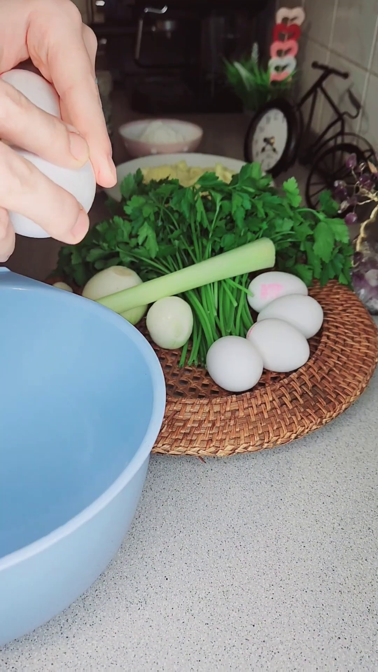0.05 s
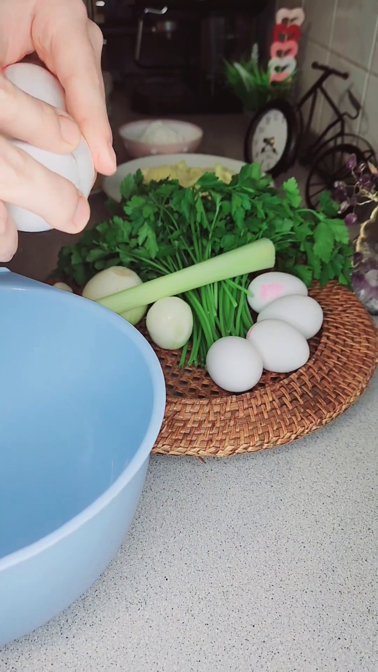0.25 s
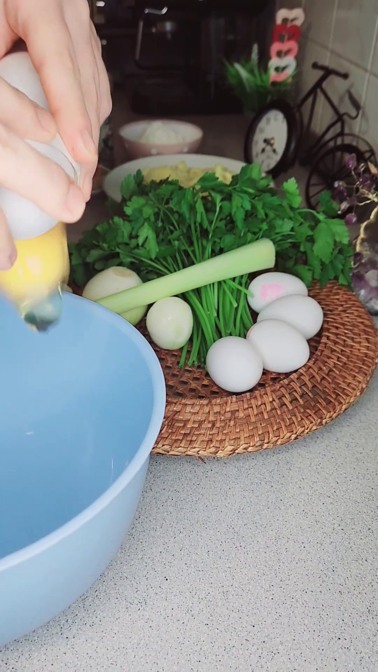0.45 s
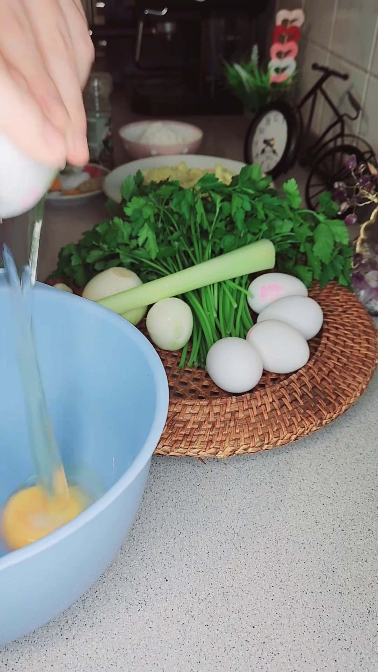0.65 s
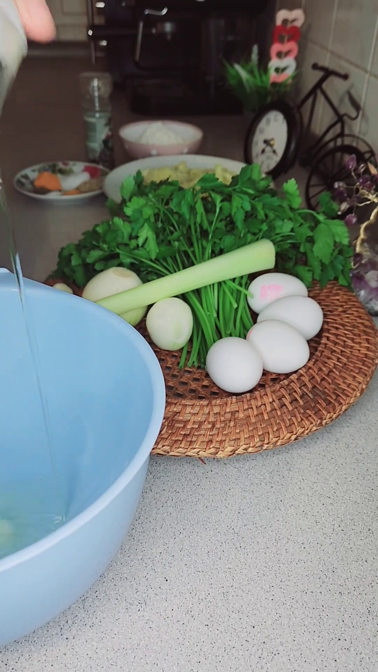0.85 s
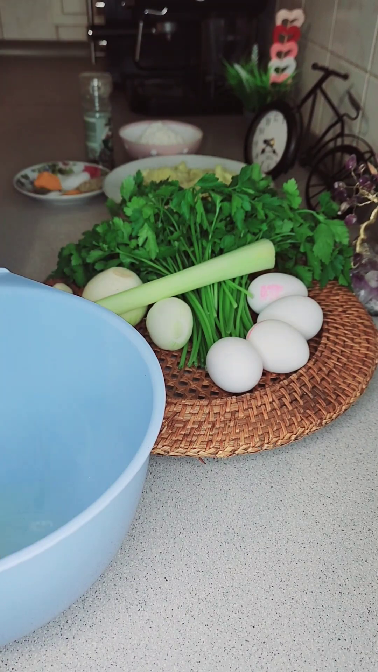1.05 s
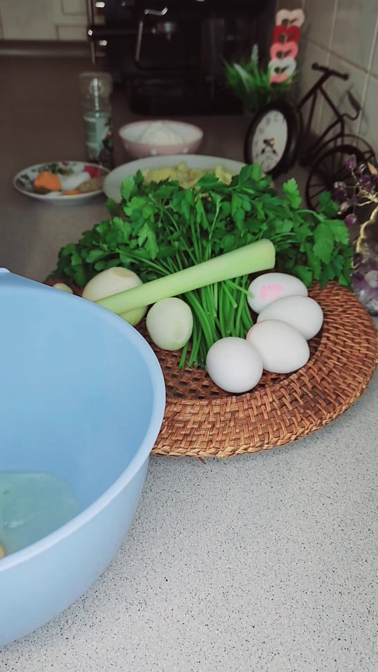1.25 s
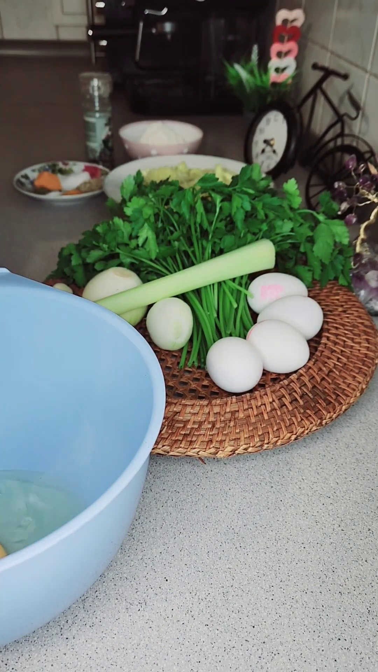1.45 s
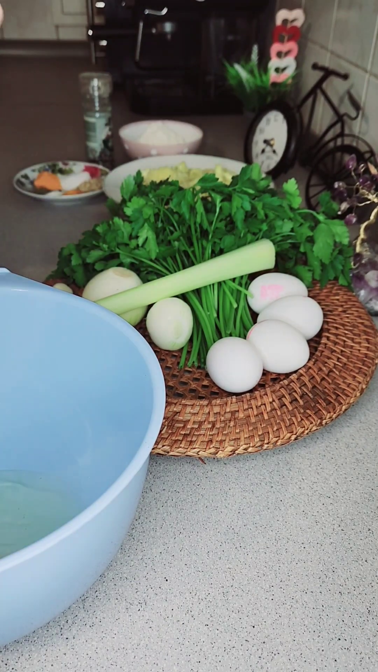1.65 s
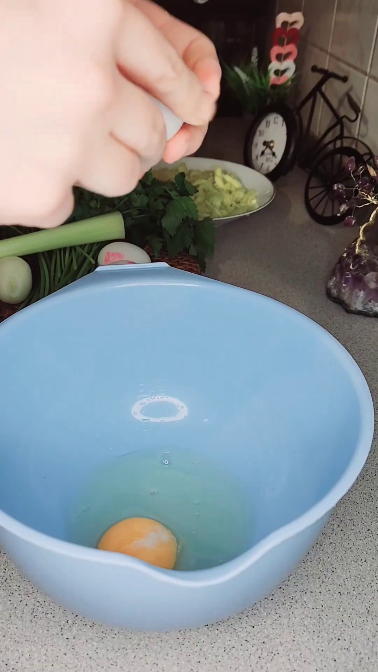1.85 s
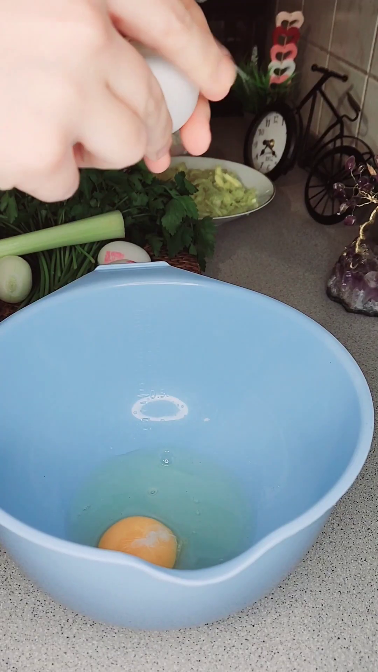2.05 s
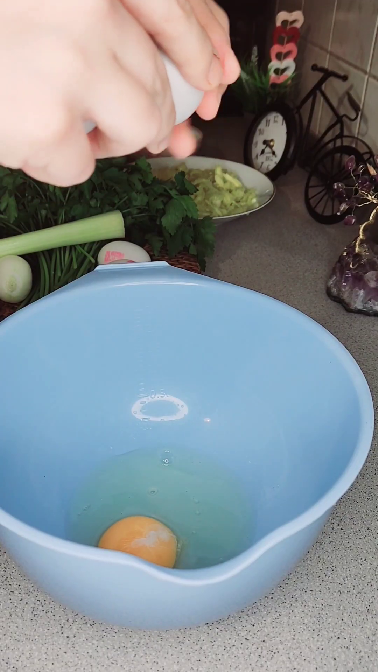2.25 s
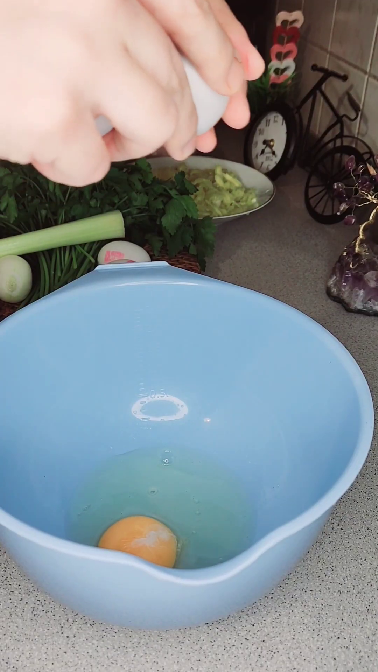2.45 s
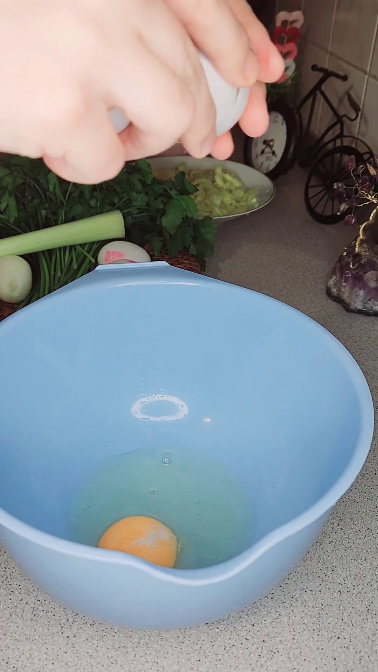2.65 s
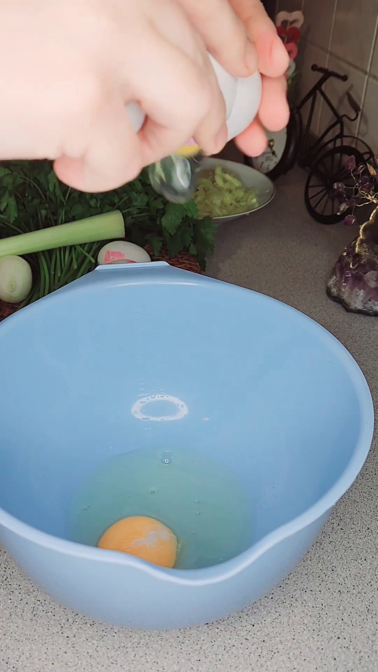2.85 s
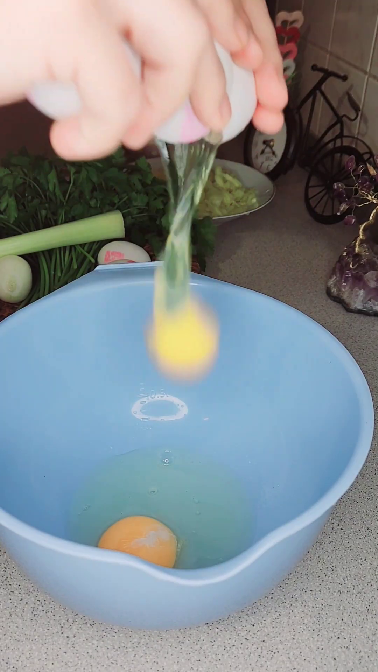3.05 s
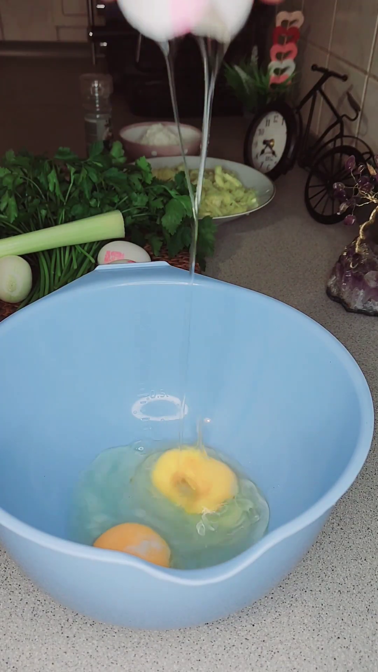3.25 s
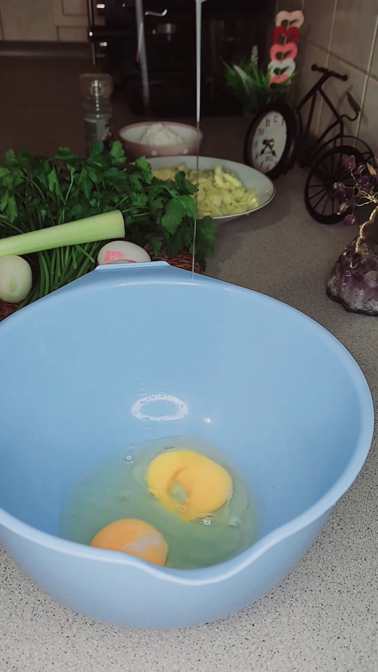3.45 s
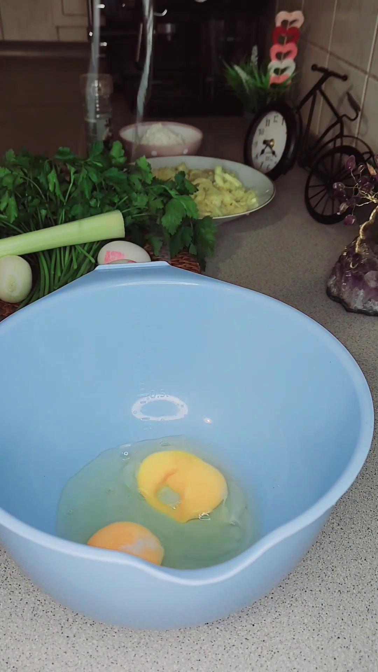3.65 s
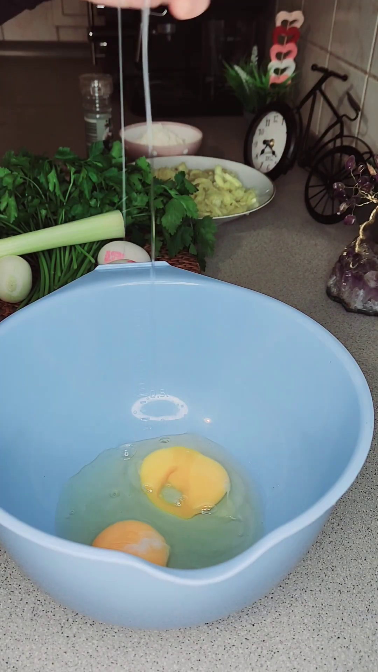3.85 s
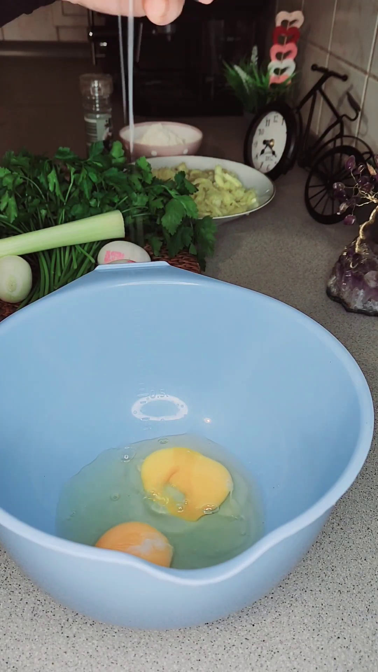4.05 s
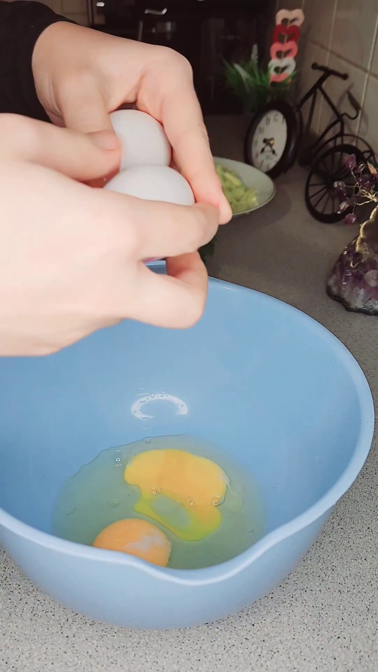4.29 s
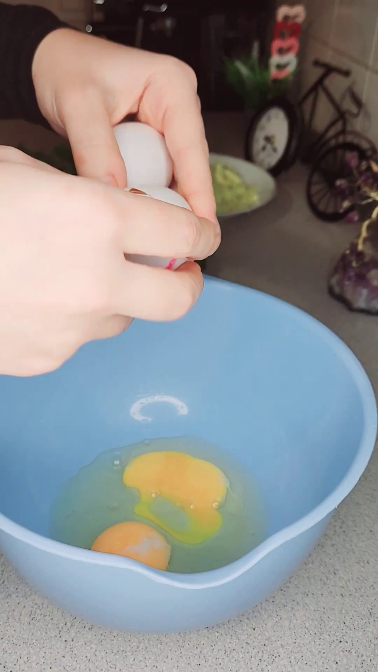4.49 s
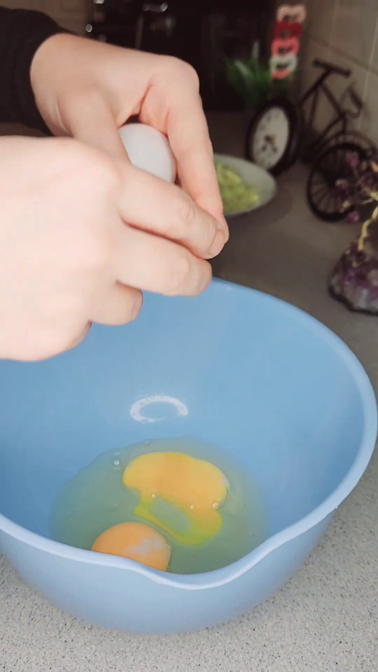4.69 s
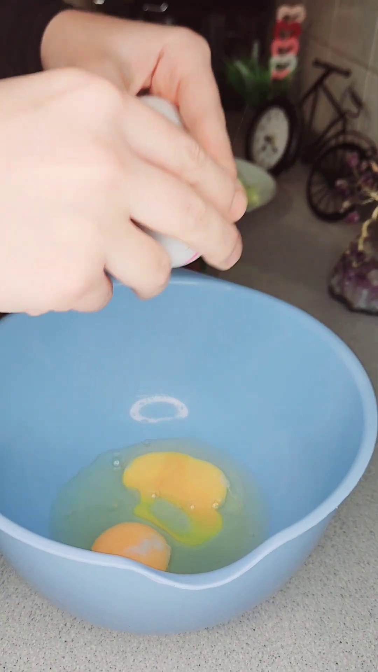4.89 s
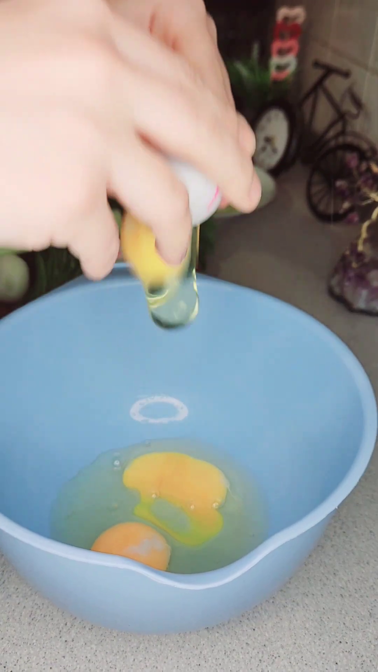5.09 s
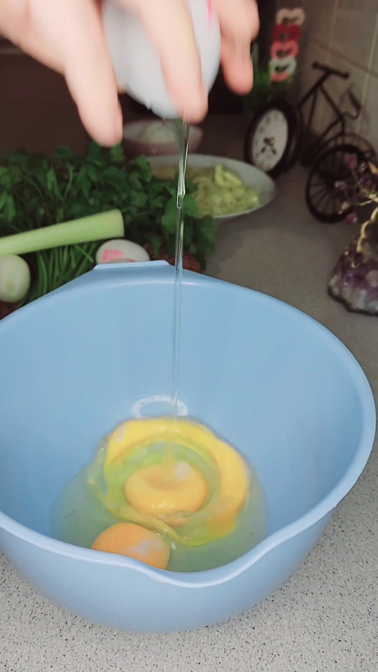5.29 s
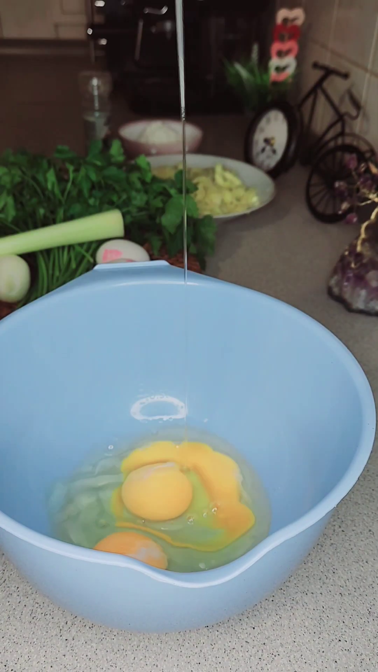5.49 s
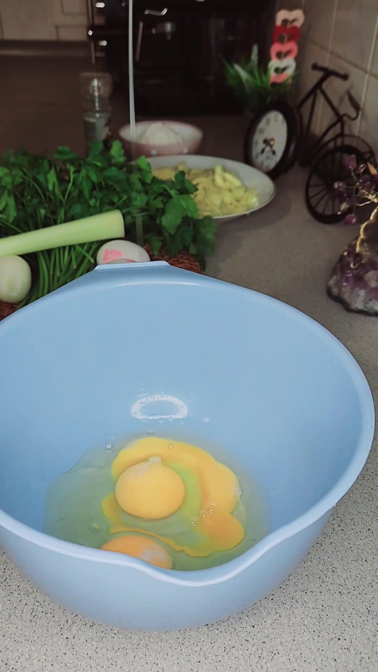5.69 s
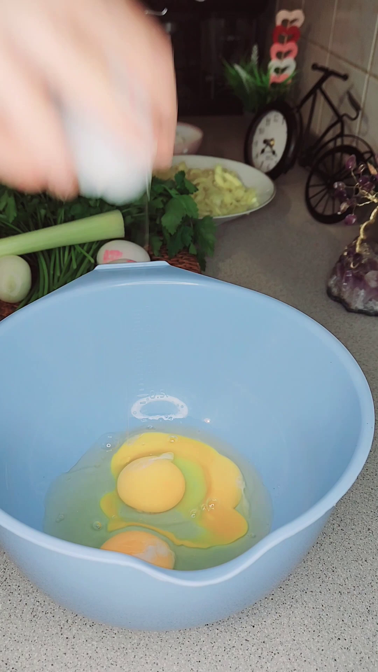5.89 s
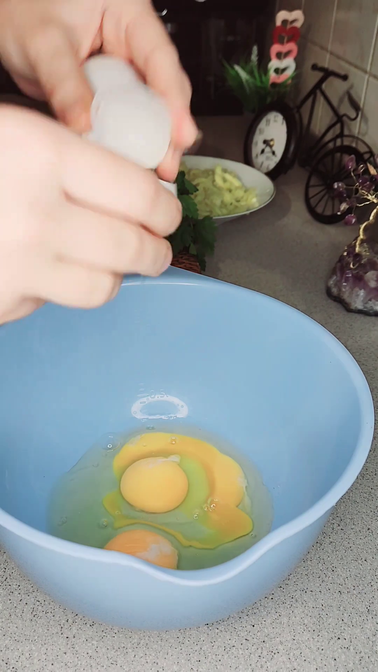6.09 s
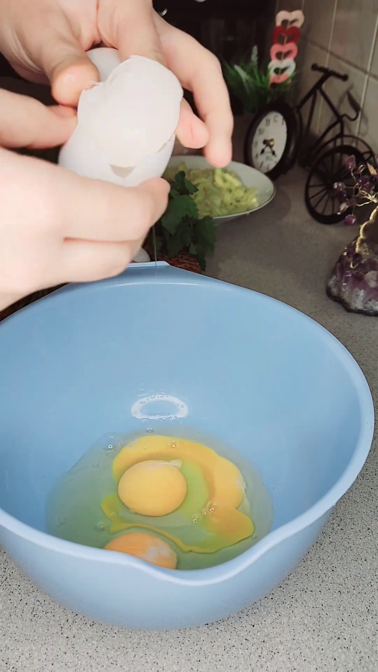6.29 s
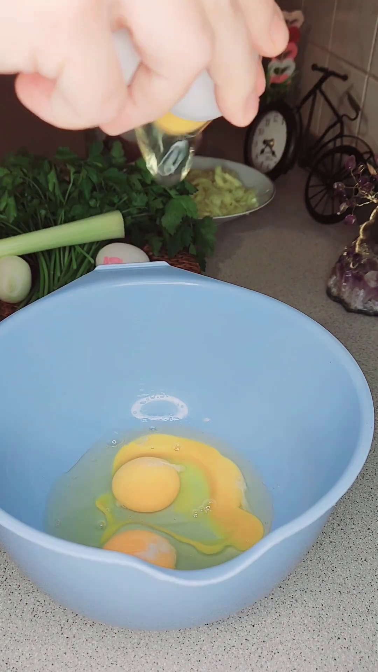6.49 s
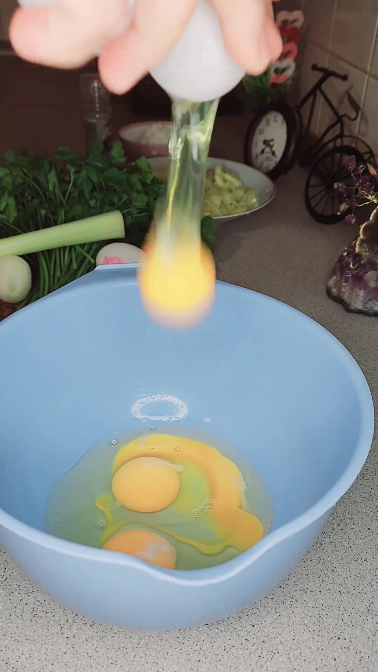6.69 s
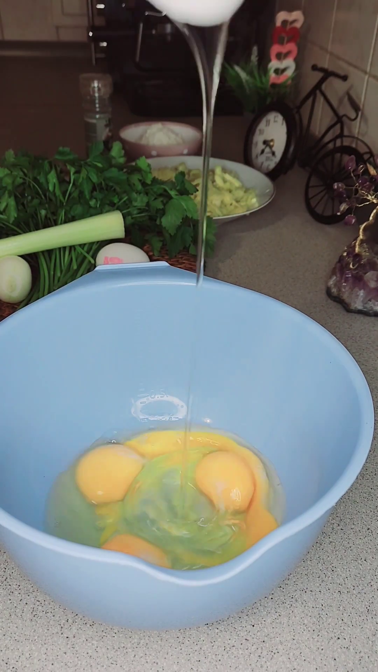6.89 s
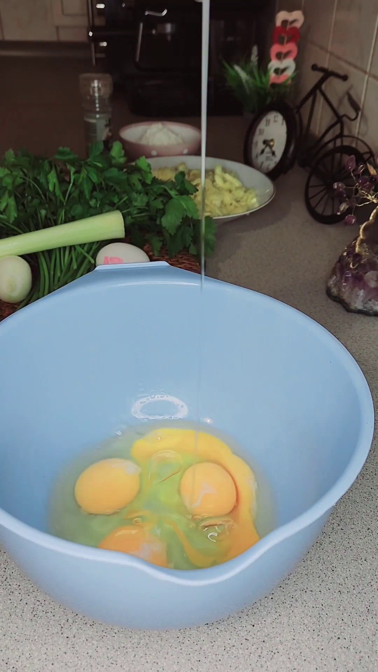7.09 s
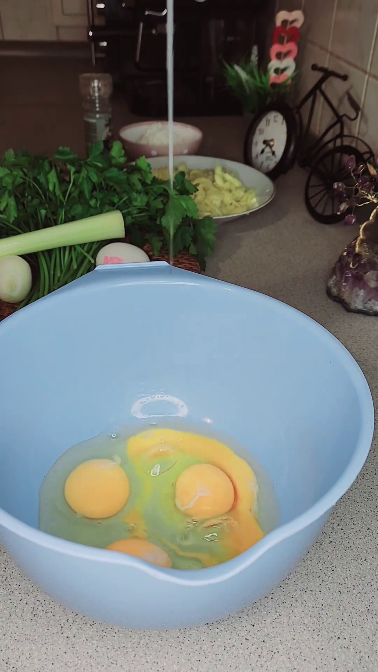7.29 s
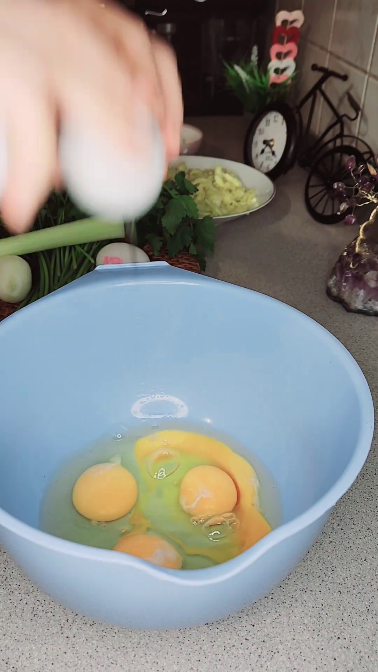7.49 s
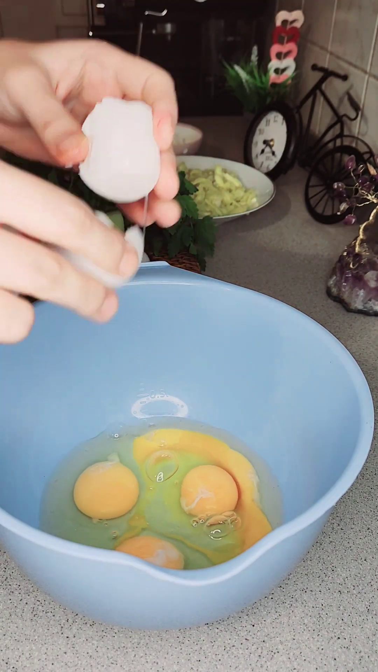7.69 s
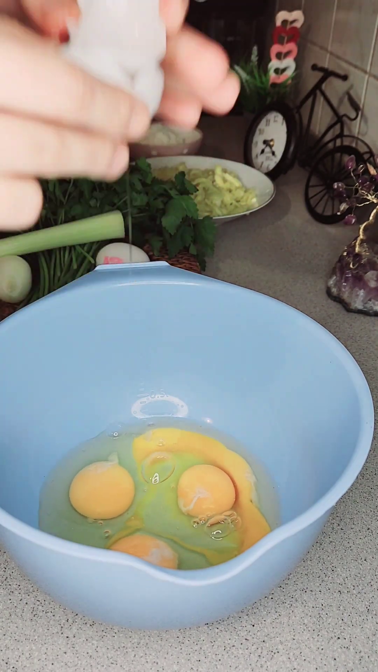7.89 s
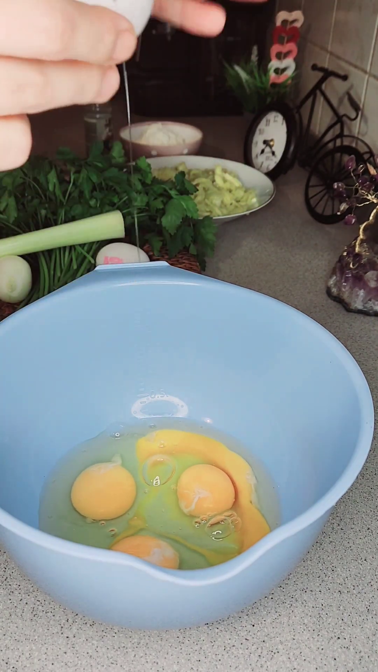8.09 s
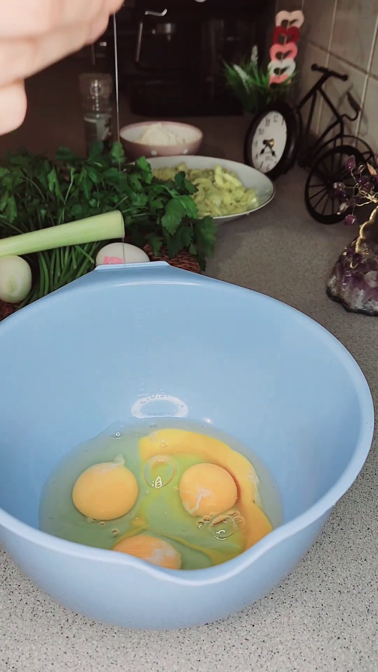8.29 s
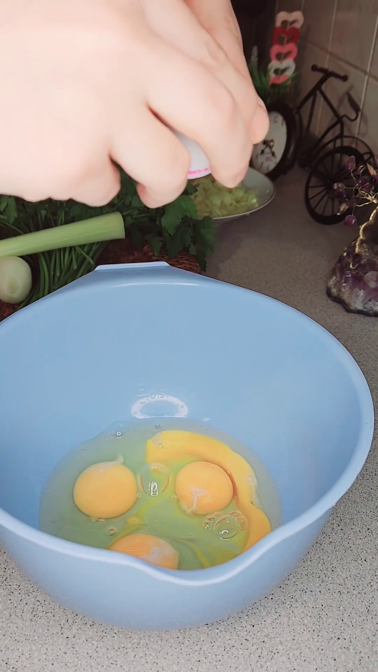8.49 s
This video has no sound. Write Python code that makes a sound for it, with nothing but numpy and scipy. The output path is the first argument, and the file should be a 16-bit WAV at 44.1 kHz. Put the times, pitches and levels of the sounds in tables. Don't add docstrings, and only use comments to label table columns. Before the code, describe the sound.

Close, crisp eggshell cracks and crackling tears, then soft wet plops and low bowl thumps, repeated egg by egg over a faint fridge hum.

```python
import sys
import numpy as np
from scipy import signal
from scipy.fft import rfft, irfft, next_fast_len
from scipy.io import wavfile
from scipy.ndimage import uniform_filter1d, map_coordinates

SR = 44100
rng = np.random.default_rng(int(sys.argv[2]) if len(sys.argv) > 2 else 0)


def gain_from_db(level_db):
    decades = np.asarray(level_db, float) / 20
    return 10 ** decades


def materialize(psi):
    bounded = np.clip(np.atleast_2d(psi).T, -1, 1)
    quanta = np.round(bounded * 32767).astype(np.int16)
    wavfile.write(sys.argv[1], SR, quanta)


N = 376569


def unit(x):
    return x / np.sqrt(np.mean(x ** 2) + 1e-20)


def along(points, hz):
    f, v = np.transpose(points)
    return np.interp(np.log(hz + 1), np.log(f + 1), v)


def gain_at(points, t):
    s, db = np.transpose(points)
    return gain_from_db(np.interp(t, s, db))


def filtered(x, response):
    m = next_fast_len(N + SR // 2)
    return irfft(rfft(x, m) * response(np.fft.rfftfreq(m, 1 / SR)), m)[..., :N]


def in_step(hz):
    cycles = np.round(12 * hz / SR)
    return np.round(cycles * SR / hz).astype(int)


def pick(modes, count, spread):
    hz, db = np.array(modes)[rng.integers(0, len(modes), count)].T
    return hz * np.exp(spread * rng.standard_normal(count)), db


def grains(s, db, hz, cycles, lag, size=160):
    k = np.arange(size)
    turns = np.clip(hz, 200, .45 * SR)[:, None] * k / SR
    left = gain_from_db(db)[:, None] * np.sin(2 * np.pi * turns) * np.exp(-turns / cycles)
    right = left * gain_from_db(rng.normal(0, 4, (len(s), 1)))
    at_left = np.round(s * SR).astype(int)[:, None] + k
    at_right = at_left + lag[:, None]
    return np.array([np.bincount(at.ravel(), ring.ravel(), N + SR)[:N]
                     for at, ring in ((at_left, left), (at_right, right))])


def swarm(rows, count):
    s, db, *cols, t60 = np.repeat(np.array(rows), count, axis=0).T
    turn = (np.arange(len(s)) % count + rng.uniform(0, 1, len(s))) / count
    late = turn ** 1.3 * t60 / 2
    size_db = db - 4.0 + 12 * np.log10(t60 / 0.088 + 0.43) - 60 * late / t60
    size_db += 20 * np.log10(1 - 0.55 * np.exp(-late / (0.024 * t60)))
    blow_db, blow_s = 2.5, 0.0038
    size_db += blow_db * late / blow_s * np.exp(1 - late / blow_s)
    lag = np.repeat(rng.integers(5, 19, len(rows)), count)
    return s + late, size_db, late, lag, cols


def fracture(s, db, hz, edge_db, top_db, lag, spiky_db):
    # pitch_hz, level_db
    piece_rings = [(3150, -7), (3680, 0), (4400, -4), (5400, -7)]
    # pitch_hz, level_db
    edge_rings = [(6500, -9), (7300, 0), (7900, -1)]
    count = len(s)
    scatter = rng.standard_normal((count, 3))
    crack_size = np.minimum(rng.exponential(1, count), 3.5)
    db = db + spiky_db * (crack_size - 1)
    small_db = -5 + 0.15 * edge_db
    small_hz, small_share_db = pick(piece_rings, count, spread=.06)
    edge_hz, edge_share_db = pick(edge_rings, count, spread=.03)
    large_hz = hz * np.exp(.11 * scatter[:, 0])
    top_hz = 13200 * np.exp(0.56 * scatter[:, 1])
    dry_hz = 1.15 * hz * np.exp(0.27 * scatter[:, 2])
    large = grains(s, db, large_hz, cycles=3.8, lag=lag, size=320)
    small = grains(s, db + small_db + small_share_db + 3, small_hz, cycles=7, lag=lag, size=280)
    edge = grains(s, db + edge_db + edge_share_db + 4, edge_hz, cycles=5.5, lag=lag, size=140)
    top = grains(s, db + top_db, top_hz, cycles=0.4, lag=lag, size=40)
    crack = grains(s, db - 3, dry_hz, cycles=2.2, lag=lag)
    return crack + large + small + edge + top


def snaps():
    # start_s, peak_db, sharpness_db, t60_s
    halves = [(.8741, -48, 0, 0.17), (.9193, -48.5, 3, 0.089), (4.479, -45.5, -3.5, 0.06),
              (1.775, -49, -13, 0.19), (1.8375, -51, 13.5, 0.03), (2.2477, -54, 11, 0.039),
              (3.225, -49.5, -19, .19), (4.5041, -51, -1, 0.18), (5.074, -43.5, -5.5, 0.058),
              (5.2372, -50, 21, 0.02), (6.595, -46, -0.5, 0.043), (6.801, -46, -8, 0.14),
              (6.879, -40.5, -5, 0.046), (7.7932, -74, 14, 0.021)]
    plates = [(.3586, -33.5, 3.5, 0.07), (.6378, -26.5, -11, 0.05), (.701, -56.5, -13, .12),
              (.709, -33, -52, 0.026), (.73, -41, -12, 0.11), (.742, -41.5, -19.5, 0.056),
              (2.8777, -57.5, 10.5, 0.03), (3.0696, -44, 4, 0.087), (3.134, -44, -22.5, 0.035),
              (3.1794, -58.5, 4, 0.028), (3.2075, -32, -2, 0.013), (4.06, -60, 0, 0.04),
              (4.434, -50.5, -12, 0.033), (4.4665, -52, 1, 0.0066), (5.1155, -38, -5.5, .08),
              (5.202, -44, -58, 0.16), (5.2146, -37, -18, 0.09), (6.2243, -46, 2, 0.073),
              (6.294, -50.5, -4, 0.036), (6.3713, -52.5, -33, 0.06), (6.417, -43, 9.5, 0.039),
              (6.7446, -49.5, 1, 0.1)]
    flakes = [(.2468, -31, 3, .085), (.782, -36.5, 0, .082), (.9469, -49.5, -5.5, .14),
              (1.766, -48, -12, .22), (2.4327, -53, 9.5, 0.059), (2.7584, -48, 4, .11),
              (2.8197, -47, 3, 0.029), (3.268, -35, -2, .025), (4.119, -43.5, 7, .1),
              (4.858, -54.5, 16, 0.073), (4.9304, -29, -12, .08), (4.941, -26.5, -10.5, .06),
              (5.291, -49, 0, .14), (5.5754, -51, -1, .13), (6.2046, -56, 2.5, .12), (6.479, -48, 5.5, .12),
              (6.489, -41.5, -1, .13), (6.754, -48, -31, 0.086), (6.7866, -47, -9, 0.15),
              (6.985, -66, -6, .11), (7.1062, -42, -8, .025), (7.161, -57, 5, 0.037),
              (7.1694, -44.5, -8, .089), (7.181, -42, -1, .056), (7.236, -45.5, -2.5, .1),
              (7.652, -49.5, -9.5, .069), (7.8595, -39, -8, 0.14), (8.0098, -45, 3, .11),
              (8.114, -41.5, 7.5, .093), (8.2256, -43.5, -1.5, .062)]
    chips = [(.193, -59, 5.5, 0.32), (.2275, -40.5, -1.5, .09), (.615, -51, -8, 0.074),
             (2.601, -48, -16, 0.027), (4.097, -40, 3, .06), (4.53, -61, 19.5, .045),
             (4.8714, -34.5, 10, 0.023), (4.88, -35.5, 0, .19), (5.312, -41, -1.5, .05),
             (5.329, -45.5, 6, 0.062), (5.6982, -52, 1, 0.054), (5.7169, -46, -2, .085),
             (6.853, -42.5, -8, 0.02), (6.8495, -63, 17.5, .015), (6.8715, -58.5, 18, .015),
             (6.976, -57, 2.5, .1), (4.517, -51, 8, .04), (2.811, -52.5, -5, 0.049),
             (8.02, -49.5, -0.5, .05), (4.849, -58, 9.5, .12), (7.2815, -39, -2.5, 0.025),
             (8.0269, -44.5, 5.5, .12), (8.0525, -37, -3.5, 0.24), (8.086, -45, 17, 0.044),
             (8.103, -50.5, 12.5, 0.14), (8.18, -47.5, -11, 0.081)]
    # start_s, peak_db
    ticks = [(0.085, -76), (.6, -79), (1.043, -71), (1.228, -71.5), (1.514, -75), (1.5337, -79),
             (1.9036, -65.5), (2.207, -71), (2.224, -75), (2.27, -71), (3.4745, -69), (3.58, -81),
             (3.614, -79), (3.699, -86), (3.728, -76.5), (3.773, -68.5), (4.6566, -75.5), (4.757, -80),
             (4.783, -74), (6.3417, -72), (8.3806, -69.5), (8.45, -77), (7.775, -79), (4.62, -78),
             (4.71, -79)]
    # start_s, peak_db, pitch_hz, t60_s
    pings = [(.2477, -19, 3820, 0.21), (.2477, -24, 2456, 0.17), (.249, -16, 7660, 0.13),
             (.3595, -32.5, 3130, 0.18), (.3595, -26, 5670, .14), (.6385, -26.5, 1894, 0.042),
             (.7085, -28, 1850, 0.039), (.9455, -39.5, 4510, 0.14), (2.431, -49.5, 3310, .06),
             (2.55, -36, 5530, 0.064), (2.6015, -35.5, 3130, 0.11), (3.2087, -29, 4550, 0.046),
             (3.3822, -56.5, 3280, .18), (4.8726, -19.5, 4360, 0.12), (4.879, -25, 2730, .05),
             (4.9395, -24, 2100, .11), (4.94, -23, 3110, 0.11), (4.941, -29, 4500, 0.04),
             (6.418, -31, 2010, .1), (6.48, -31, 7300, 0.22), (7.236, -38, 3770, .1),
             (7.239, -29.5, 5340, 0.065), (7.2822, -31.5, 3780, 0.14), (3.069, -27.5, 3960, 0.085)]
    sizes = ((halves, 1500), (plates, 1890), (flakes, 2270), (chips, 2750))
    rows = [(s, db, hz, sharp_db, t60) for table, hz in sizes for s, db, sharp_db, t60 in table]
    tick_hz, tick_sharp_db, tick_t60_s = 2270, 14.5, 0.074
    rows += [(s, db, tick_hz, tick_sharp_db, tick_t60_s) for s, db in ticks]
    s, db, late, lag, (hz, edge_db) = swarm(rows, count=50)
    top_db = edge_db + 19.5 - 300 * late
    broken = fracture(s, db, hz, edge_db, top_db, lag, spiky_db=0.5)

    s, db, late, lag, (hz,) = swarm(pings, count=40)
    ping_hz = hz * np.exp(.035 * rng.standard_normal(len(s)))
    return broken + grains(s, db - 12, ping_hz, cycles=9, lag=in_step(hz), size=360)


def clicks(count=3):
    # start_s, peak_db, pitch_hz
    sharp_cracks = [(0.2282, -31, 2000.0), (0.2478, -10.5, 4330), (0.3595, -20.5, 7500),
                    (0.6399, -27, 2500), (7.7945, -44, 5700), (0.731, -33.0, 1960.0), (0.785, -33, 7440),
                    (0.9477, -29, 2130.0), (2.21, -37, 7660), (2.4343, -32.5, 3000), (2.6024, -36.0, 3270),
                    (3.0706, -32, 1890.0), (3.134, -44.0, 1510.0), (3.18, -40, 7110.0),
                    (3.209, -25.0, 7240), (3.2235, -36, 1720.0), (3.2692, -28, 13350.0),
                    (3.4773, -45.0, 7500), (3.773, -47, 7680), (4.0487, -48, 7300), (4.0971, -27, 3770.0),
                    (4.1075, -27, 3140.0), (4.188, -35, 2240.0), (4.504, -39, 4440), (4.5275, -32, 7360.0),
                    (4.8619, -36.0, 7260), (4.874, -22.0, 4350.0), (4.9337, -22, 2170.0),
                    (4.9407, -24, 2240.0), (4.947, -26, 4440), (4.96, -43, 2910.0), (5.2144, -44, 2050.0),
                    (5.2385, -19, 7600), (5.2915, -45, 7100), (5.3106, -34, 2820.0), (6.2311, -33, 1910),
                    (6.4194, -34, 1900), (6.4805, -27, 7110.0), (6.4893, -28, 7260), (6.5967, -36, 1550),
                    (6.8538, -32, 7540.0), (6.8722, -38, 7500), (6.8806, -29, 1650), (7.1055, -46, 2220.0),
                    (7.1696, -31, 2480.0), (7.182, -38, 2030), (7.2352, -34, 3700.0), (7.2825, -28, 3870),
                    (7.292, -32, 2160), (7.8685, -25, 3560), (7.9013, -39, 2300.0), (8.0285, -41, 2330.0),
                    (8.0405, -42, 7600.0), (8.0657, -25, 2910.0), (8.0733, -40, 3170.0),
                    (8.083, -23, 2710.0), (8.105, -27, 7540.0), (8.116, -24, 2670.0),
                    (8.1871, -41.0, 2800.0), (8.2283, -33, 2510)]
    s, db, hz = np.transpose(sharp_cracks)
    db = db - 6
    lag = rng.integers(8, 15, len(s))
    ring_s = .0012
    ring = grains(s, db, hz, cycles=ring_s * hz[:, None], lag=in_step(hz))
    chance = rng.uniform(0, 1, (len(s) * count, 2))
    s, db, lag = (np.repeat(v, count) for v in (s, db, lag))
    broad_hz = 2500 * 5 ** chance[:, 1]
    broad = grains(s + .0008 * chance[:, 0], db - 5, broad_hz, cycles=0.68, lag=lag, size=60)
    return ring + broad


def crunch(count=400):
    # peak_s, rise_s, fall_s, level_db, sharpness_db
    squeezes = [(.86, 0.031, 0.25, -59, -3), (2.262, 0.07, 0.19, -78, 21), (4.135, 0.058, 0.07, -43, 2),
                (4.52, 0.12, 0.081, -59, 0), (4.942, 0.12, 0.33, -60, 4), (5.316, 0.034, 0.03, -39, -29),
                (5.718, 0.02, 0.024, -62.5, 18), (6.231, 0.058, 0.077, -61, -5),
                (7.875, 0.015, 0.24, -46, -3), (8.1, 0.093, 0.11, -47, -3)]
    clumps = map_coordinates(rng.standard_normal(N // 300 + 4), [np.arange(N) / 300])
    peak, rise, fall, db, sharp_db = np.repeat(np.array(squeezes), count, axis=0).T
    after = rng.uniform(0, 1, len(peak)) * (rise + fall) - rise
    away = np.where(after < 0, -after / rise, after / fall)
    s = peak + after
    dulls_db, ease_db = 28, 28.5
    edge_db = sharp_db - dulls_db * away * (after > 0)
    db = db + 10 * np.log10((rise + fall) / 0.16) - ease_db * away - 0.5
    db = db + 0.37 * clumps[(s * SR).astype(int)]
    lag = rng.integers(4, 16, len(s))
    return fracture(s, db, 2355, edge_db, edge_db - 18, lag, spiky_db=-1.5)


def tears(count=250):
    # start_s, length_s, level_db, sharpness_db
    seams = [(.001, 0.039, -58.5, 4), (0.174, 0.05, -67, 6), (1.754, .05, -54, 4.5),
             (1.833, 0.024, -47, 5.5), (2.225, 0.12, -67.5, 19.5), (3.275, 0.054, -73, -1.5),
             (4.044, .11, -37.5, -2), (4.159, 0.078, -41, -6.5), (7.289, 0.036, -45, 5.5),
             (8.39, 0.08, -88, 22), (2.789, 0.12, -60, -2), (8.067, 0.067, -52.5, 9.5),
             (0.653, 0.15, -50, -5)]
    start, length, db, edge_db = np.repeat(np.array(seams), count, axis=0).T
    done = rng.uniform(0, 1, len(start))
    sag_db = 8.5
    db = db + 10 * np.log10(length / 0.12) - sag_db * done - 6.5
    lag = rng.integers(4, 16, len(db))
    return fracture(start + done * length, db, 2180, edge_db, edge_db + 17.5, lag, spiky_db=1.5)


def splinters():
    # start_s, peak_db, t60_s
    showers = [(0.7835, -27, 0.04), (2.8205, -37.5, 0.05), (2.8785, -42, .04), (3.7735, -38, .06),
               (2.7584, -29.5, 0.053), (4.9195, -36, 0.02), (3.2066, -34, 0.028), (3.2675, -26.5, 0.1),
               (4.8735, -26, 0.06), (5.2385, -23, 0.04), (0.3595, -28, .04), (1.838, -35, .03)]
    s, db, late, lag, _ = swarm(showers, count=60)
    hz = 12800 * np.exp(.1 * rng.standard_normal(len(s)))
    return grains(s, db - 4, hz, cycles=2.5, lag=lag, size=40)


def sings(count=60):
    # start_s, length_s, level_db, pitch_hz
    loose_pieces = [(2.764, .085, -63.5, 2270), (4.053, 0.09, -53, 3650), (4.116, 0.039, -52, 2300),
                    (4.131, .024, -48, 5600), (4.194, 0.045, -55, 2240), (4.198, 0.037, -59, 3600),
                    (5.203, 0.018, -50, 2050), (5.304, 0.037, -50.5, 2780), (6.216, .04, -57.5, 2060),
                    (6.218, 0.029, -58, 4000), (7.299, 0.019, -54, 7340), (8.059, 0.03, -44, 2900),
                    (8.06, 0.044, -45, 2060), (0.71, 0.033, -51, 1800), (4.972, .03, -54, 2145),
                    (5.047, .045, -63, 1570), (7.861, 0.05, -54, 4700), (8.002, 0.041, -57, 2120),
                    (4.497, .035, -55, 1115), (4.056, 0.064, -54, 5200), (0.366, 0.03, -60, 1800),
                    (1.005, .08, -71, 2250), (.001, .03, -64, 4800), (.192, .026, -64, 3400),
                    (2.812, .04, -69, 2200)]
    start, length, db, hz = np.repeat(np.array(loose_pieces), count, axis=0).T
    chance = rng.standard_normal((len(db), 2))
    s = start + length * rng.uniform(0, 1, len(db))
    db = db + 10 * np.log10(length / .05) + 4 * chance[:, 0]
    return grains(s, db, hz * np.exp(.035 * chance[:, 1]), cycles=8, lag=in_step(hz), size=360)


def scrape(count=120):
    start_s, length_s, level_db = 2.551, 0.048, -62
    from_hz, to_hz = 5900, 2800
    done, scatter = rng.uniform(0, 1, count), rng.standard_normal((2, count))
    hz = from_hz * (to_hz / from_hz) ** done * np.exp(0.12 * scatter[0])
    return grains(start_s + done * length_s, level_db + 4 * scatter[1], hz, cycles=4, lag=in_step(hz))


def shell_tone(breaking):
    # centre_hz, width_hz, depth_db
    port_dip = (9500, 1900, -17)
    centre_hz, width_hz, depth_db = port_dip

    def response(hz):
        band = 1j * hz * width_hz
        dip = 1 - (1 - gain_from_db(depth_db)) * band / (centre_hz ** 2 - hz * hz + band)
        return dip * (1j * hz / (1j * hz + 950)) ** 3
    return filtered(breaking, response)


def taps():
    # start_s, peak_db, pitch_hz, t60_s
    clean_taps = [(.2475, -20, 3900, .01), (.3590, -33, 1800, .02), (.3592, -41, 850, .012),
                  (.3586, -29, 5000, .01), (.6383, -28, 1750, .03), (.7082, -27, 1900, .025),
                  (.7305, -40, 3200, .015), (.7838, -28, 850, .035), (1.229, -56, 1900, .02),
                  (2.6012, -38, 3180, .03), (3.0702, -33, 5300, .008), (3.2082, -33, 1900, .015),
                  (3.2688, -26, 7400, .015), (3.476, -52, 2900, .03), (3.7935, -54, 2400, .015),
                  (3.897, -56, 3600, .015), (4.8725, -30, 7600, .012), (4.8735, -32, 2000, .025),
                  (5.2372, -43, 595, .04), (5.2035, -42, 1350, .05), (6.4175, -34, 1950, .03),
                  (6.755, -43, 2040, .03), (6.853, -44, 1600, .025), (6.871, -42, 640, .025),
                  (6.8792, -31, 900, .035), (7.1065, -41, 2380, .02), (8.1035, -26, 7000, .006)]
    out, t = np.zeros((2, N + SR)), np.arange(SR // 20) / SR
    for s, db, hz, t60 in clean_taps:
        ring = gain_from_db(db - 60 * t / t60) * np.sin(2 * np.pi * hz * t)
        start = round(s * SR)
        out[0, start:][:len(t)] += ring
        out[1, start + in_step(hz):][:len(t)] += ring
    return out[:, :N]


def plops():
    # start_s, peak_db, pitch_hz, t60_s
    slaps = [(0.248, -22, 934, 0.0081), (0.638, -20.5, 590, 0.033), (0.739, -27.5, 606, 0.045),
             (0.784, -17, 616, 0.072), (0.784, -34, 760, 0.035), (0.746, -30, 276, 0.054),
             (0.705, -43, 705, 0.076), (0.832, -42, 580, 0.07), (3.134, -39.5, 578.5, 0.11),
             (3.224, -33, 578, 0.091), (5.322, -47.5, 577, 0.1), (6.806, -49, 513, 0.11),
             (6.88, -27, 880, 0.018), (6.8821, -37, 1214, 0.025), (6.89, -47, 1000, 0.078),
             (6.904, -34, 738, 0.14)]
    rise = 0.0053
    out, t = np.zeros(N + SR), np.arange(SR // 2) / SR
    for s, db, hz, t60 in slaps:
        slosh = unit(uniform_filter1d(rng.standard_normal((2, len(t))), size=500))
        phase = 2 * np.pi * hz * (t + rise * t * t / .1) + .5 * slosh[0]
        ring = np.sin(phase) * gain_from_db(2.2 * slosh[1] - 60 * t / t60)
        wet = unit(uniform_filter1d(rng.standard_normal(len(t)), size=16))
        splat = gain_from_db(-17 - 60 * t / 0.045) * (wet - uniform_filter1d(wet, size=110))
        onset = 1 - np.exp(-t / 0.0024)
        out[round(s * SR):][:len(t)] += gain_from_db(db) * (ring + splat) * onset
    return out[:N]


def thuds():
    # start_s, peak_db, thump_hz, sway_db, rim_db
    landings = [
        (0.639, -31.5, 63.3, -4, -8.5),
        (0.738, -25.5, 68, -12, -6.5),
        (0.786, -32.5, 85, -10, -5.5),
        (3.134, -32.5, 112.6, -7, -7.5),
        (3.189, -41.5, 56.5, -1, 0.5),
        (5.239, -25, 104, -8, -5),
        (6.805, -28.5, 102.3, -6, -8),
        (6.849, -27, 77.6, -13, -20.5),
    ]
    out, t = np.zeros(N + SR), np.arange(SR) / SR
    bend = t + 0.28 * 0.0095 * (1 - np.exp(-t / 0.00039))
    onset = 1 - np.exp(-t / 0.0055)
    for s, db, thump_hz, sway_db, rim_db in landings:
        # pitch Hz, t60 s, level dB
        modes = ((33, 0.84, sway_db), (thump_hz, 0.17, 0), (193.3, 0.13, rim_db), (110, 0.19, rim_db - 33.5))
        for hz, t60, level_db in modes:
            ring = gain_from_db(db + level_db - 60 * t / t60) * np.sin(2 * np.pi * hz * bend)
            out[round(s * SR):][:SR] += ring * onset
    return out[:N]


def ports(x, lead_s):
    sides = np.array([[1], [-1]])
    return filtered(x, lambda hz: np.exp(1j * np.pi * hz * lead_s * sides))


def tiles(x):
    # freq_hz, t60_s
    room_decay = [(300, 0.32), (2000, 0.26), (8000, 0.24), (15000, 0.15)]
    hz, t, z = signal.stft(rng.standard_normal((2, SR // 3)), SR, nperseg=256)
    fade = gain_from_db(-60 * t / along(room_decay, hz)[:, None])
    tail = signal.istft(z * fade, SR, nperseg=256)[1]
    delayed = np.pad(x, (120, 0))[None]
    return signal.fftconvolve(delayed, tail / np.linalg.norm(tail[0]), axes=1)[:, :N]


def kitchen():
    # freq_hz, level_db per Hz
    air_tone = [(140, -48.5), (230, -46), (300, -8), (633, -7.5), (886, -4.5), (1770, -15.5), (3670, -16),
                (4230, -17.5), (4620, -19), (7730, -9), (9230, -48.5), (11400, -21.5), (16000, -22)]
    # freq_hz, level_db per Hz
    rumble_tone = [(13, -65), (22, -5), (43, -5), (64, -19), (80, -4), (102, 2.5), (129, -6.5), (187, -4.5),
                   (236, -19), (280, -21), (360, -33.5), (620, -120)]
    # freq_hz, likeness
    port_likeness = [(60, 0.96), (180, 1), (550, 0.41), (1650, -0.022), (4970, 0.003), (15000, -0.03)]
    # time_s, level_db
    fridge_load = [(0, -58.5), (.66, -57.5), (1.54, -58), (2.55, -56), (4.66, -56.5), (5.97, -56.5),
                   (8.28, -60), (8.54, -62)]
    # time_s, level_db
    skin_level = [(0, -75), (.88, -68.5), (1.19, -80), (2.85, -67.5), (4.09, -79), (5.16, -66),
                  (5.42, -72.5), (6.23, -75.5), (6.37, -66.5), (7.85, -76), (8.01, -61.5), (8.54, -85)]

    z = signal.stft(rng.standard_normal((2, N)), nperseg=1024)[2]
    field = uniform_filter1d(uniform_filter1d(rng.standard_normal(z.shape[1:]), 5, 0), 6, 1)
    pair = signal.istft(z * gain_from_db(1.36 * unit(field)), nperseg=1024)[1][:, :N]

    def spread(hz):
        angle = np.arccos(np.clip(along(port_likeness, hz), -1, 1)) / 2
        return [np.cos(angle), np.sin(angle)]

    def low(hz):
        return 1 / (1 + (hz / 1900) ** 6)
    mid, side = filtered(pair, spread)
    air, t = np.array([mid + side, mid - side]), np.arange(N) / SR
    rumble = filtered(air, lambda hz: gain_from_db(along(rumble_tone, hz)))
    body = filtered(air, lambda hz: gain_from_db(along(air_tone, hz)) * low(hz))
    hiss = filtered(air, lambda hz: gain_from_db(along(air_tone, hz)) * (1 - low(hz)))
    fridge = gain_at(fridge_load, t) * (gain_from_db(2) * unit(rumble) + gain_from_db(-6.5) * unit(body))
    hiss_floor_db = -76
    return fridge + np.hypot(gain_from_db(hiss_floor_db), gain_at(skin_level, t)) * unit(hiss)


def scene():
    scene_changes = [0, 1.858, 4.26, 5.9, 8.6]
    breaking = snaps() + crunch() + tears() + scrape() + splinters() + clicks() + sings()
    shell, slap, t = shell_tone(breaking), plops(), np.arange(N) / SR
    near = gain_from_db(2.5) * shell + ports(slap, lead_s=.0001) + ports(thuds(), lead_s=.0004) + taps()
    to_room = gain_from_db(-4.0) * shell[0] + gain_from_db(-8) * slap
    room = np.zeros((2, N))
    for start, end in zip(scene_changes, scene_changes[1:]):
        part = (t >= start) & (t < end)
        room += part * tiles(part * to_room)
    return near + room + kitchen()


def top_cut(x):
    return signal.sosfilt(signal.butter(12, 16990, fs=SR, output="sos"), x)


def record(dry):
    # freq_hz, difference_db
    left_lean = [(60, 1), (250, 3.5), (600, 0), (1500, 3.5), (4000, 6), (12000, 7)]
    top_hz = 15900

    def colour(hz):
        lean_db = along(left_lean, hz) * np.array([[.5], [-.5]])
        top_db = -22 * (hz > top_hz) - 40 * (hz > 1.05 * top_hz)
        return gain_from_db(lean_db + top_db) / (1 + (24 / (hz + 1)) ** 4)
    return top_cut(filtered(dry, colour))


dry = scene()
out = record(dry)
materialize(out)
```